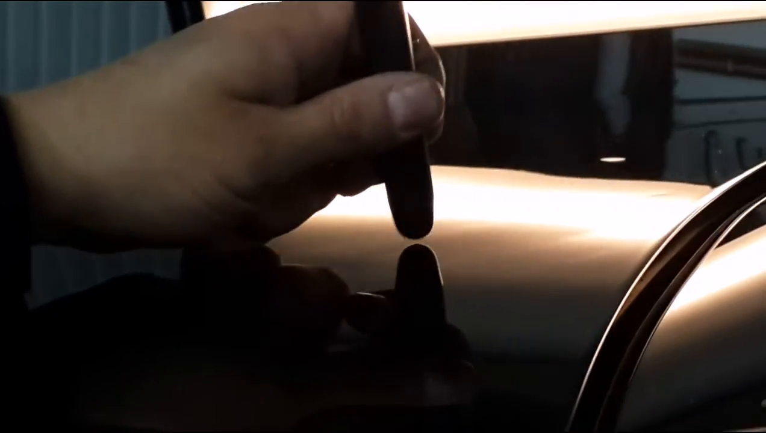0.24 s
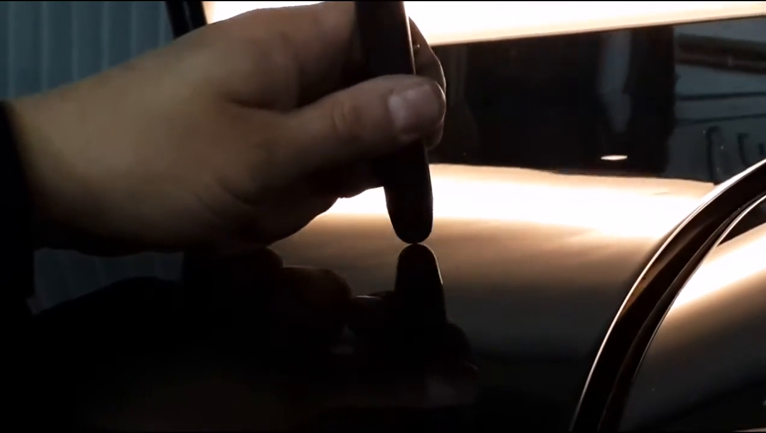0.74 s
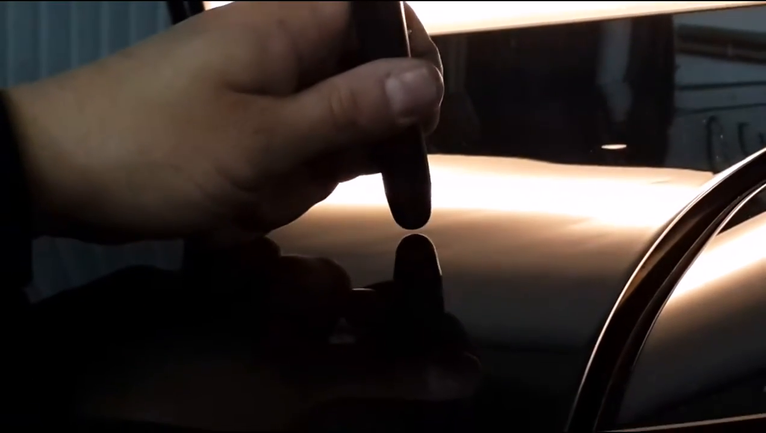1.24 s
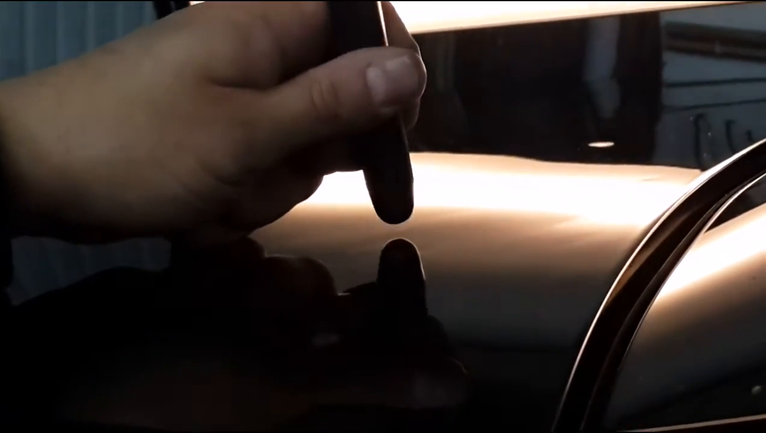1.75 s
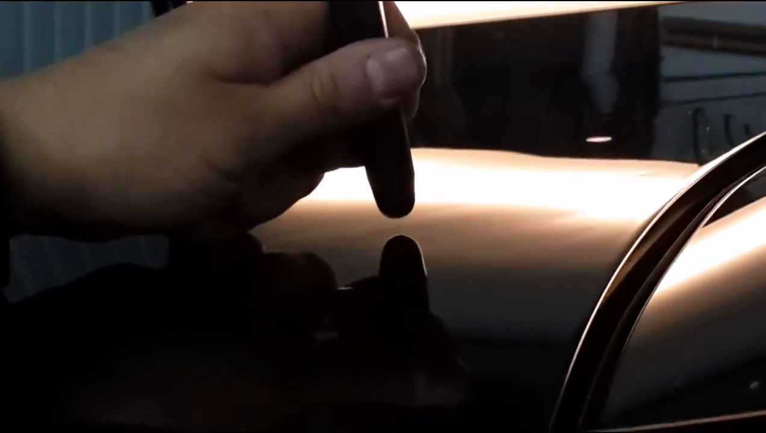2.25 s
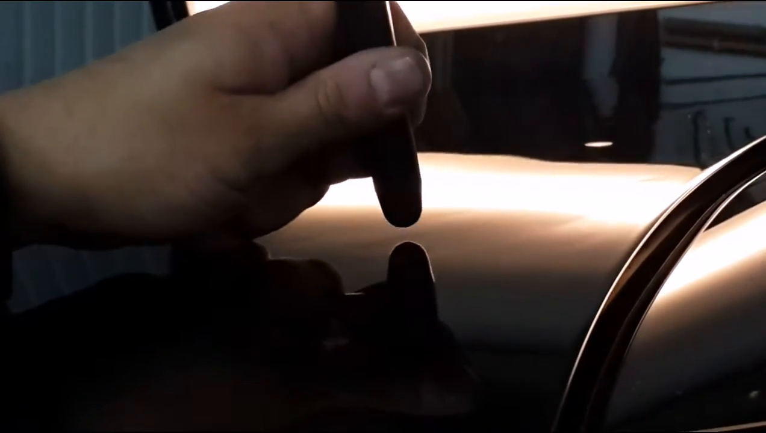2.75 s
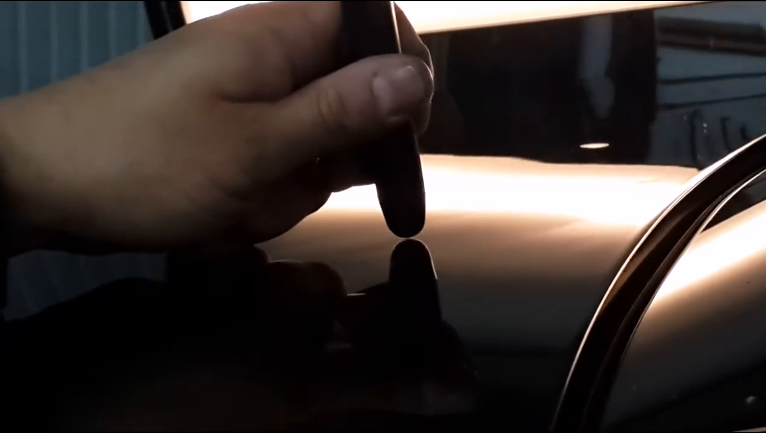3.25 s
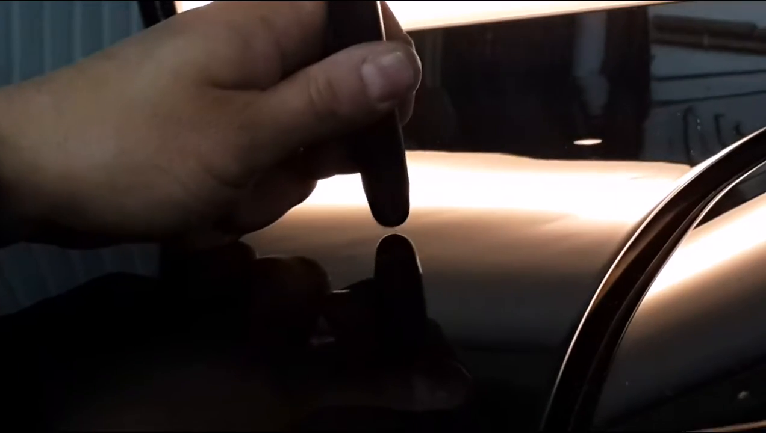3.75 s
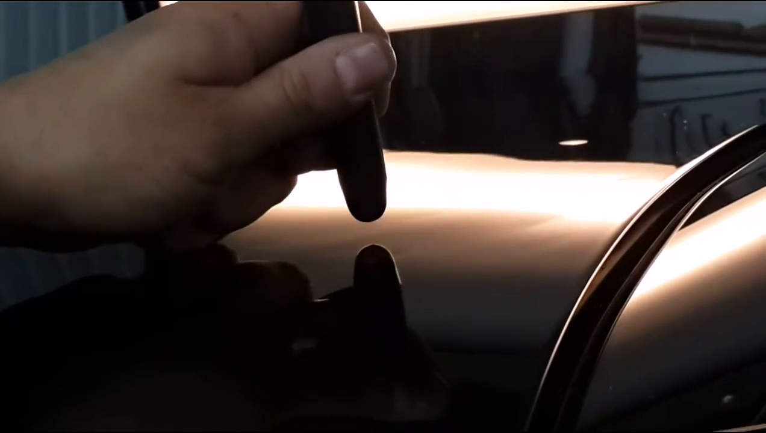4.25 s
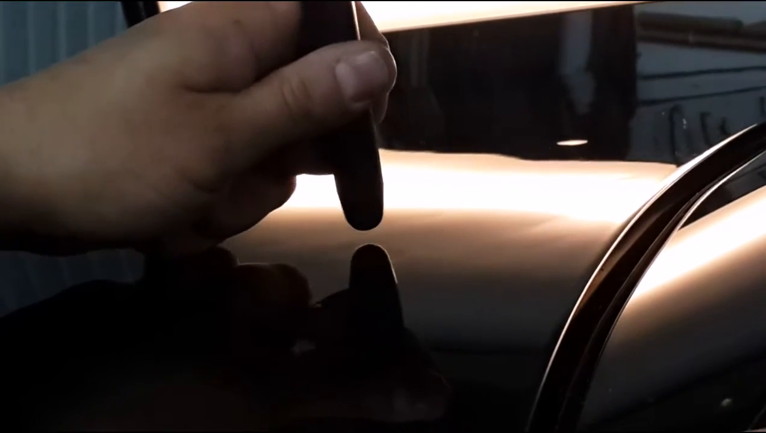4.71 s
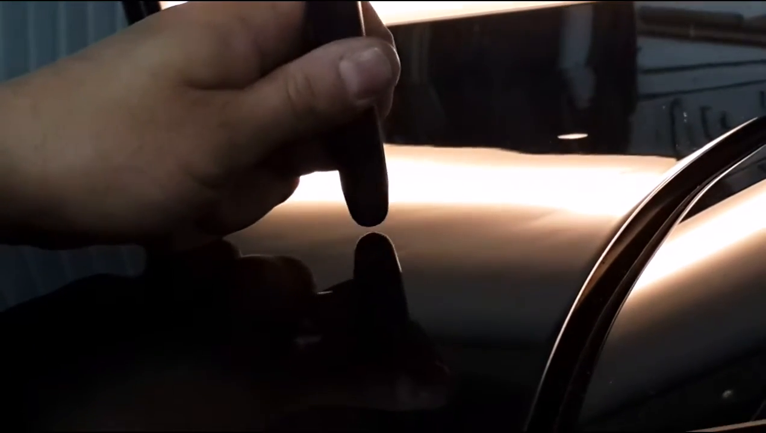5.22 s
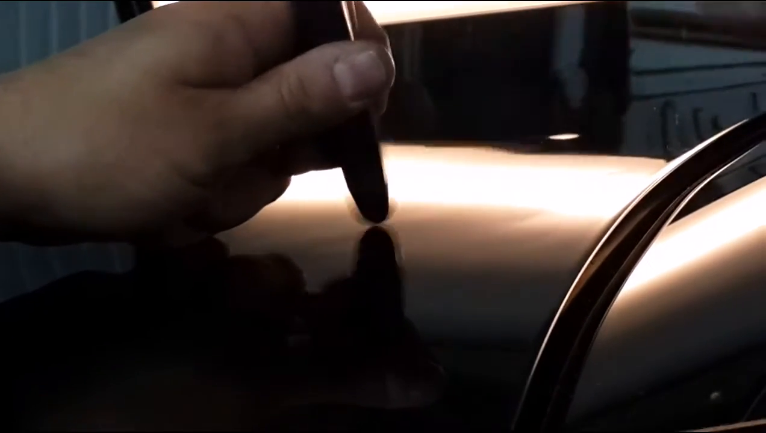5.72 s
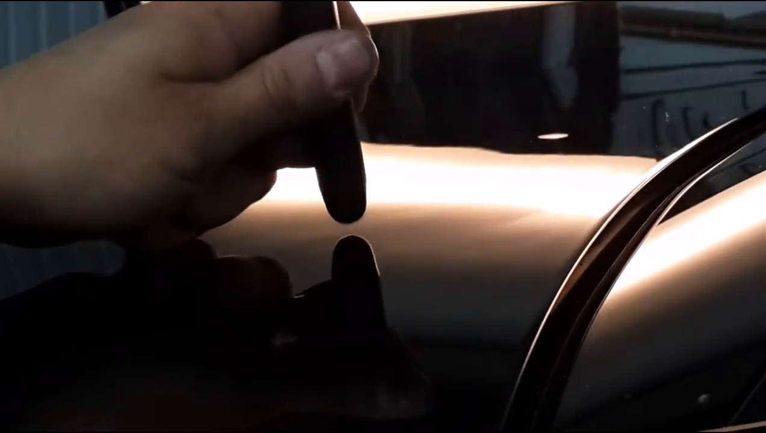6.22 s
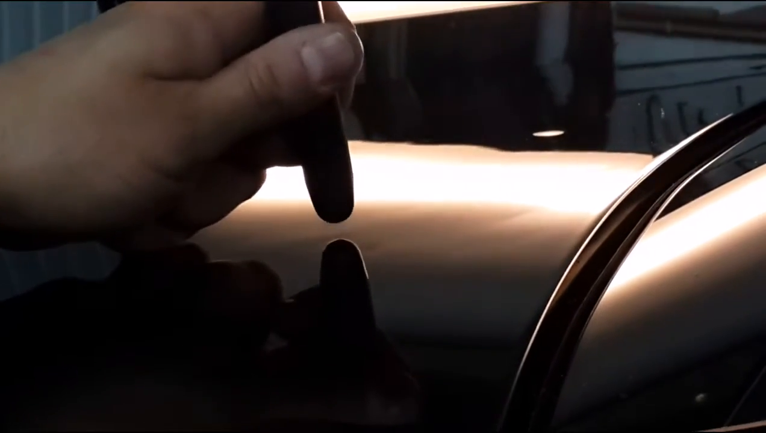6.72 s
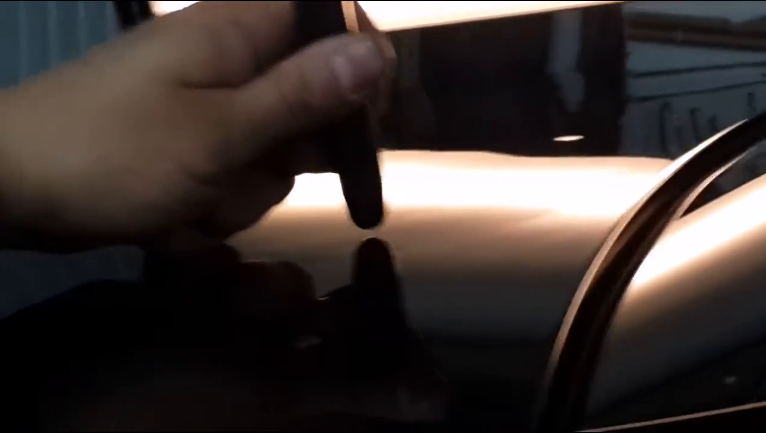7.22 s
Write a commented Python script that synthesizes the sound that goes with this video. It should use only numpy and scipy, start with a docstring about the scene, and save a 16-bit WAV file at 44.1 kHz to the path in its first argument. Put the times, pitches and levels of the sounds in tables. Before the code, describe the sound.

A small hammer taps a metal punch on a car's sheet-metal panel, sixteen sharp hollow clanks in fairly even runs with short pauses.

```python
"""Punch tapped on a car panel

A small hammer taps a punch held on a car's sheet-metal panel, in fairly even runs with short pauses.
Each blow is a short clank of damped modes and noise, then panel, car body and garage ring on as
lasting modes and a dense wash, nearly alike from blow to blow. Between the blows the tool touches
the panel lightly; one tiny tick and the faint air of the garage, both shaped noise, lie underneath."""
import sys
import numpy as np
from scipy import signal
from scipy.fft import rfft, irfft, next_fast_len
from scipy.io import wavfile

SR = 44100
rng = np.random.default_rng(int(sys.argv[2]) if len(sys.argv) > 2 else 0)


def pcm_store(signal):
    """Save signal as 16-bit PCM."""
    levels = np.round(np.clip(np.atleast_2d(signal), -1, 1) * 32767)
    wavfile.write(sys.argv[1], SR, levels.astype(np.int16).T)


N = 329427


def amp(db):
    """Turn decibels into a gain."""
    return 10 ** (np.asarray(db) / 20)


def unit(x):
    """Scale to rms 1."""
    return x / np.sqrt(np.mean(x ** 2) + 1e-20)


def along(points, hz):
    """Read (Hz, value) points on a log frequency axis."""
    point_hz, value = np.transpose(points)
    return np.interp(np.log(hz + 1), np.log(point_hz + 1), value)


def pan(left_right_db):
    """Left and right gains for a level difference; positive leans left."""
    return amp(np.array([[.5], [-.5]]) * left_right_db)


def filtered(x, response):
    """Multiply the spectrum of x by a response of frequency."""
    n = x.shape[-1]
    padded = next_fast_len(n + 4096)
    spectrum = rfft(x, padded) * response(np.fft.rfftfreq(padded, 1 / SR))
    return irfft(spectrum, padded)[..., :n]


def stereo(pair):
    """Two unrelated noises become left and right: alike in the bass, apart in the treble."""
    # left-right likeness: freq_hz, correlation (0 to 1)
    likeness = [(120, .96), (350, 0.9), (700, .5), (1400, 0), (4000, 0)]

    def mid_side_gains(hz):
        angle = np.arccos(np.clip(along(likeness, hz), -1, 1)) / 2
        return np.array([np.cos(angle), np.sin(angle)])

    mid, side = filtered(pair, mid_side_gains)
    return np.array([mid + side, mid - side])


def add(track, s, sound):
    """Mix a sound into the track at time s, cut off at the track's end."""
    part = track[:, max(round(s * SR), 0):][:, :sound.shape[1]]
    part += sound[:, :part.shape[1]]


def air(level_db):
    """The faint rumble and hiss of the garage: steady noise, strongest in the bass."""
    # spectrum of the still garage: freq_hz, relative_density_db
    air_spectrum = [(25, -7), (60, -9), (130, -4.5), (350, -15), (1500, -23.5), (4000, -29), (15000, -32)]
    noise = stereo(rng.standard_normal((2, N)))
    return amp(level_db) * unit(filtered(noise, lambda hz: amp(along(air_spectrum, hz))))


def tick(s, level_db, t60):
    """One tiny dry click as the grip shifts: a noise burst that dies at once."""
    # spectrum of a fingertip shifting on the punch: freq_hz, relative_density_db
    tick_spectrum = [(800, -15), (2700, 2.5), (6000, -15), (14000, -14)]
    age = np.arange(N) / SR - s
    noise = unit(filtered(rng.standard_normal((2, N)), lambda hz: amp(along(tick_spectrum, hz))))
    return noise * (age > 0) * amp(level_db - 60 * np.abs(age) / t60)


def wash(t, rise, hold):
    """Countless modes and echoes: they build up, hold level for a moment, then die band by band."""
    # dense overlapping modes and wall echoes: freq_hz, relative_density_db
    wash_spectrum = [(50, -24), (120, -5.5), (240, -5), (450, 1.5), (1200, 1.5), (1550, -7), (2200, -7.5),
                     (2390, -4), (3200, -13.5), (3750, -8.5), (4150, -20), (5350, -25.5), (8500, -28.5),
                     (15000, -46)]
    # time for each band to fall by 60 dB: freq_hz, t60_s
    wash_decay = [(80, .65), (250, 0.47), (600, 0.35), (1500, 0.44), (2400, 0.43), (3100, .42),
                  (3750, 0.42), (6000, 0.41), (13000, 0.34)]
    # balance of the wash: freq_hz, left_right_db
    wash_lean = [(120, 2), (700, -3.5), (1900, -3.5), (3000, -4), (5200, 3), (9000, -2)]
    # level the noise in every cell, so the wash is smooth and no chance line stands out
    cells = signal.stft(rng.standard_normal((2, len(t))), nperseg=2048)[2]
    even = signal.istft(cells / (np.abs(cells) + 1e-12), nperseg=2048)[1]
    band_hz, age, bands = signal.stft(even, SR, nperseg=256)
    fade = amp(-60 * np.maximum(age - hold, 0) / along(wash_decay, band_hz)[:, None])
    tail = stereo(signal.istft(bands * fade, SR, nperseg=256)[1][:, :len(t)])
    coloured = filtered(tail, lambda hz: amp(along(wash_spectrum, hz)) * pan(along(wash_lean, hz)))
    return unit(coloured * (1 - np.exp(-t / rise)))


def body(t, rise, apart_hz):
    """Lasting modes swell as the blow spreads; the low ones start in step, the higher at scattered phases."""
    # modes of panel, car body and garage: freq_hz, level_db, t60_s, left_right_db
    lasting_modes = [(89.3, -36, 0.44, -2), (122, -44, 1.1, -3.5), (141.5, -21.5, 0.39, -0.5),
                     (151.15, -30.5, 0.59, -2.5), (162.7, -34.5, 0.78, 0), (196.55, -37, .62, -0.5),
                     (282.1, -32.5, 0.57, -1), (368, -37, .43, 2), (392.7, -30, .41, -4.5),
                     (444.2, -21.5, 0.3, -5), (494, -28, 0.24, -0.5), (523, -28.5, 0.51, -6),
                     (651, -31.5, 0.46, -6), (675, -28, 0.37, -16.5), (739.6, -24.5, 0.33, -8.5),
                     (825, -32, 0.33, -3.5), (920, -31, .43, -7.5), (983, -24, .38, 3.5),
                     (1053, -27.5, 0.46, 4), (1059.6, -26.5, .41, -5), (1076, -34.5, 0.3, -0.5),
                     (1168, -30.5, 0.22, 4.5), (1226, -31.5, 0.2, -3), (1310, -34.5, 0.2, -0.5),
                     (1842, -35, 0.47, -9.5), (1898, -34.5, 0.39, -13.5), (2360, -35, 0.51, 0),
                     (2480, -39.5, .55, -2), (3780, -39, .46, 4.5), (3760, -38.5, 0.47, 3.5)]
    out = np.zeros((2, len(t)))
    draws = rng.uniform(-0.98, 1, (len(lasting_modes), 2))
    for (hz, db, t60, lean_db), (phase, side) in zip(lasting_modes, draws):
        scatter = hz ** 2 / (hz ** 2 + apart_hz ** 2)
        # left and right start up to a quarter cycle apart
        start = np.pi * scatter * (phase + np.sign(side) * np.array([[1], [-1]]) / 4)
        out += pan(lean_db) * amp(db - 60 * t / t60) * np.sin(2 * np.pi * hz * t + start)
    return out * (1 - np.exp(-t / rise))


def walls(sound, dull_hz):
    """The nearest walls return the clank as a few delayed copies, dulled by a low-pass."""
    # first answers of the garage walls: delay_s, level_db, left_right_db
    answers = [(.0075, -20.5, 5.5), (0.0242, -12.5, 2), (0.0262, -8, -3.5), (0.028, -13, 3),
               (0.044, -16, 0.5), (0.046, -12.5, -2.5), (0.0578, -14, -4)]
    out = np.zeros_like(sound)
    for delay, db, lean_db in answers:
        add(out, delay, amp(db) * pan(lean_db) * sound)
    return filtered(out, lambda hz: 1 / (1 + 1j * hz / dull_hz) ** 2)


def clank(t, rise, spread, crack_db, crack_t60):
    """The contact: heavily damped modes and a noisy crack; bending waves bring the treble first."""
    # punch and sheet around the point of contact: freq_hz, level_db, t60_s, left_right_db
    contact_modes = [(177, -26, 0.037, 1), (352, -9, 0.015, -2.5), (816, -3, 0.011, -3),
                     (1142, -2, 0.012, 0.5), (1866, -14.5, 0.02, -6.5), (2464, -14, 0.032, -11),
                     (2796, -17, 0.03, -5.5), (3706, -15.5, 0.017, 1), (5257, -25.5, 0.018, 3.5),
                     (8040, -27.5, 0.013, -2.5)]
    # spectrum of the crack: freq_hz, relative_density_db
    crack_spectrum = [(100, -4), (1000, 5.5), (4000, -2.5), (8500, -12.5), (15000, -21.5)]
    out = np.zeros((2, len(t)))
    for k, (hz, db, t60, lean_db) in enumerate(contact_modes):
        age = np.maximum(t - spread * np.sqrt(1000 / hz), 0)  # spread is the delay at 1 kHz
        envelope = amp(db - 60 * age / t60) * (1 - np.exp(-age / rise))
        # neighbouring modes start in opposite directions
        out += (-1) ** k * pan(lean_db) * envelope * np.sin(2 * np.pi * hz * age)
    noise = rng.standard_normal(out.shape)
    crack = unit(filtered(noise, lambda hz: amp(along(crack_spectrum, hz))))
    return out + crack * amp(crack_db - 60 * t / crack_t60) * (1 - np.exp(-t / rise))


def punch(hz, punch_hz, width_hz, share):
    """The punch's own resonance, set by grip and tilt: a peak with a hollow just above it."""
    coupling = share * width_hz * punch_hz
    resonance = 1 + coupling / (punch_hz ** 2 - hz ** 2 + 1j * hz * width_hz)
    return resonance / (1 + coupling / punch_hz ** 2)  # the deep bass passes unchanged


def stroke(hz, force_db, hardness_db, punch_hz):
    """Colour of one blow: a hard contact adds edge and fizz; a tighter grip raises and damps the punch."""
    easy_grip_hz = 2662  # resonance of the punch in an average grip
    damping_db_per_octave = 16.5
    fizz_share, fizz_db = 0.32, -0.67  # top treble: share of the hardness, level at hardness 0 dB
    ring_db = -damping_db_per_octave * np.log2(punch_hz / easy_grip_hz)
    colour = [(1800, 0.00046), (2500, ring_db), (3600, hardness_db),
              (7000, fizz_db + fizz_share * hardness_db)]
    return amp(force_db + along(colour, hz)) * punch(hz, punch_hz, width_hz=350, share=0.86)


def rolled_off(x, cut_hz):
    """The deepest bass of the tapping is rolled off: a high-pass."""
    return signal.sosfilt(signal.butter(2, cut_hz, "highpass", fs=SR, output="sos"), x)


def tapping(clank_db, body_db, wash_db):
    """Every contact strikes the same spot and wakes the same modes; force, hardness and grip colour blows."""
    # hammer blows: start_s, force_db, hardness_db (of the contact)
    blows = [(0.1028, 1, 3.5), (.508, .6, -4.5), (.911, 1, 5), (1.631, 1.3, -.5), (2.1648, 1.36, 1.5),
             (2.656, .5, -.5), (3.076, 0, -1.5), (3.509, 1.35, -4.5), (4.2257, -2.5, 1.5), (4.607, 1.97, 2),
             (5.0513, 0.8, 0), (5.4604, .5, 1), (5.8486, .5, -6), (6.2485, -0.06, -2.5), (6.7, 1.6, 2),
             (7.1041, 1.33, 1.5)]
    # light touches of the punch on the panel between the blows: start_s, force_db
    touches = [(.029, -37), (.426, -37.5), (.832, -40), (1.492, -44), (2.029, -40), (2.572, -37),
               (3.043, -36.5), (3.408, -37.5), (4.011, -48.5), (4.586, -32.5), (5.021, -38.5), (5.4, -38),
               (5.784, -42), (6.147, -42.5), (6.601, -35), (7.037, -39), (7.416, -39)]
    # colour of every light touch: freq_hz, level_db
    soft_contact = [(150, -5), (600, 2), (1100, -3.5), (3000, -9.5)]
    # the grip tightens and eases slowly, moving the punch's resonance: time_s, resonance_hz
    grip = [(.1, 2540), (2.16, 2520), (2.8, 2790), (3.51, 2620), (4.6, 3020), (5.05, 2670), (5.46, 2700),
            (5.85, 2620), (7.1, 2490)]
    # how far the wash turns from its usual noise to fresh noise: freq_hz, angle_radians
    wash_turn = [(200, 0.24), (1000, 0.28), (3500, 0.84), (7000, 0.42)]
    earlier_blow_s = .29  # one blow falls this long before the start

    t = np.arange(SR) / SR
    track = np.zeros((2, N))
    direct = amp(clank_db) * clank(t, rise=0.00074, spread=0.00077, crack_db=-11, crack_t60=.011)
    lasting = amp(body_db) * body(t, rise=0.015, apart_hz=500)
    modes = direct + walls(direct, dull_hz=1880) + lasting

    def new_wash():
        return amp(wash_db) * wash(t, rise=0.0014, hold=0.021)

    usual = new_wash()
    # part of the wash is fresh noise in each blow, most around 3.5 kHz
    kept = filtered(usual, lambda hz: np.cos(along(wash_turn, hz)))
    for s, force_db, hardness_db in blows:
        fresh = filtered(new_wash(), lambda hz: np.sin(along(wash_turn, hz)))
        punch_hz = np.interp(s, *np.transpose(grip))
        blow = filtered(modes + kept + fresh, lambda hz: stroke(hz, force_db, hardness_db, punch_hz))
        add(track, s, blow)

    touch = filtered(modes + usual, lambda hz: amp(along(soft_contact, hz)))
    for s, force_db in touches:
        add(track, s, amp(force_db) * touch)

    # the earlier blow is still dying away
    add(track, 0, (modes + usual)[:, round(earlier_blow_s * SR):])
    return rolled_off(track, cut_hz=40)


def scene():
    """Tapping and one tick over the still air."""
    taps = tapping(clank_db=-1.5, body_db=0, wash_db=-31.0)
    return taps + tick(s=4.124, level_db=-56.5, t60=0.046) + air(level_db=-70.5)


def record(dry):
    """The microphone track: the sharpest peaks are rounded off and a steep low-pass limits the band."""
    peak_limit, top_hz = 0.89, 15600  # full scale = 1; Hz
    rounded = dry / (1 + np.abs(dry / peak_limit) ** 6) ** (1 / 6)
    return filtered(rounded, lambda hz: 1 / np.sqrt(1 + (hz / top_hz) ** 120))


dry = scene()
out = record(dry)
pcm_store(out)
```